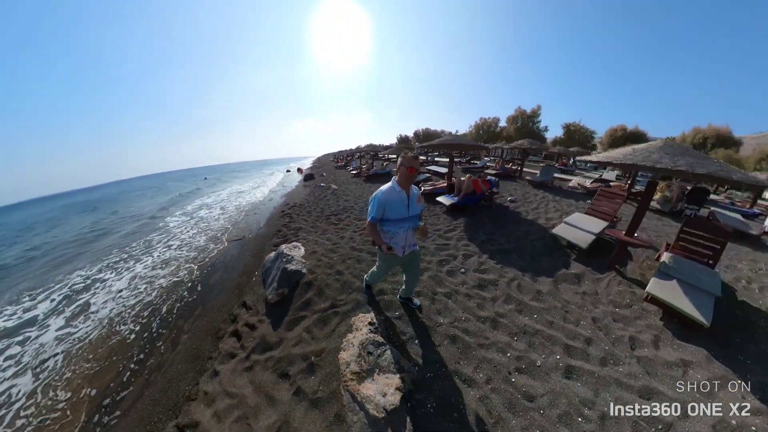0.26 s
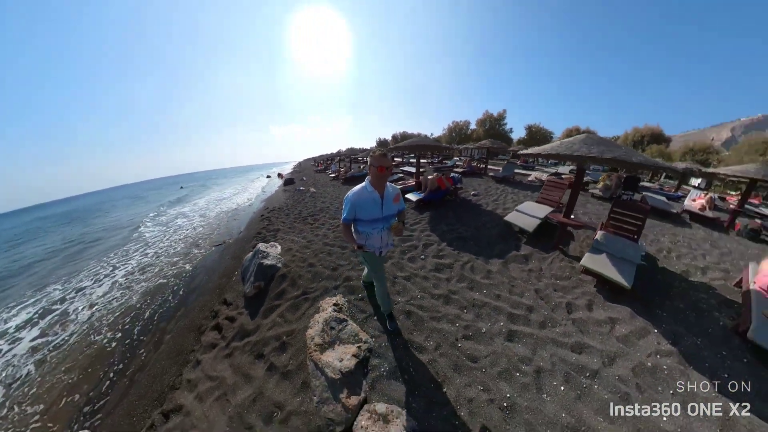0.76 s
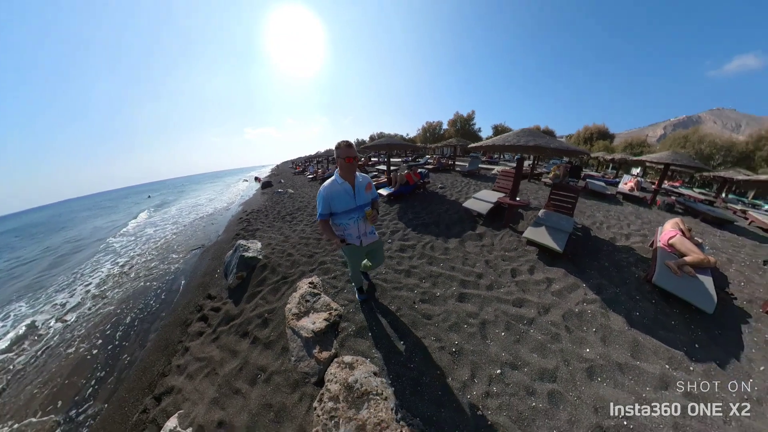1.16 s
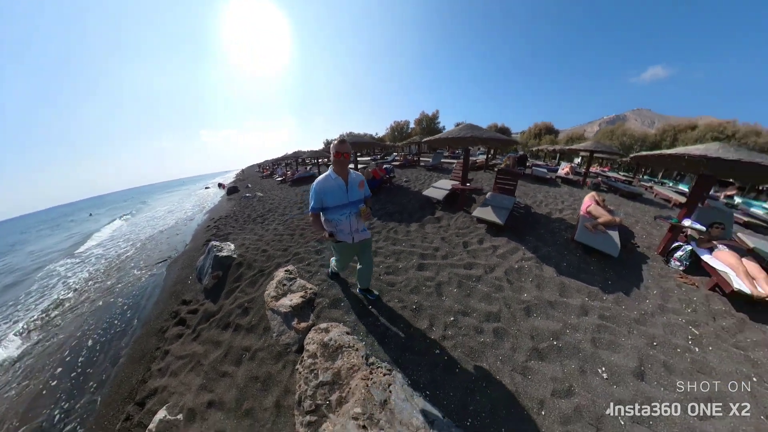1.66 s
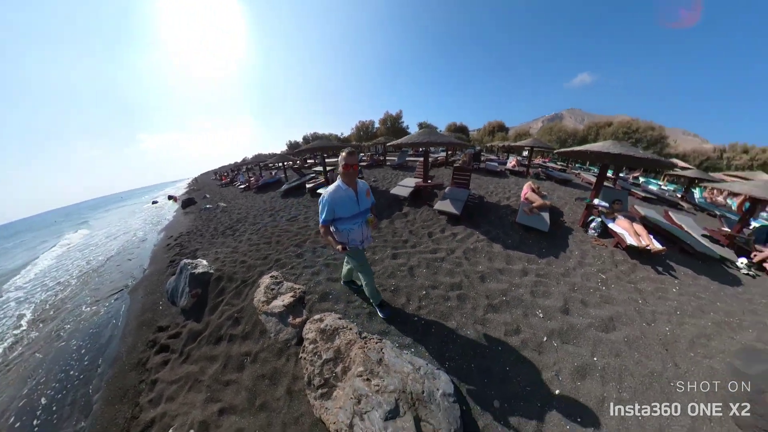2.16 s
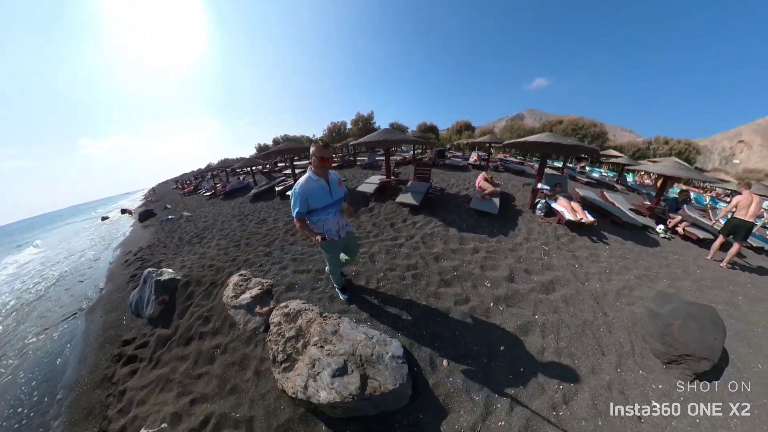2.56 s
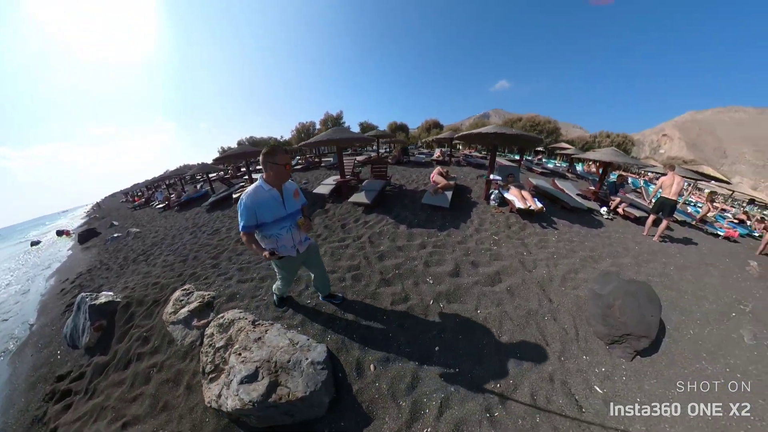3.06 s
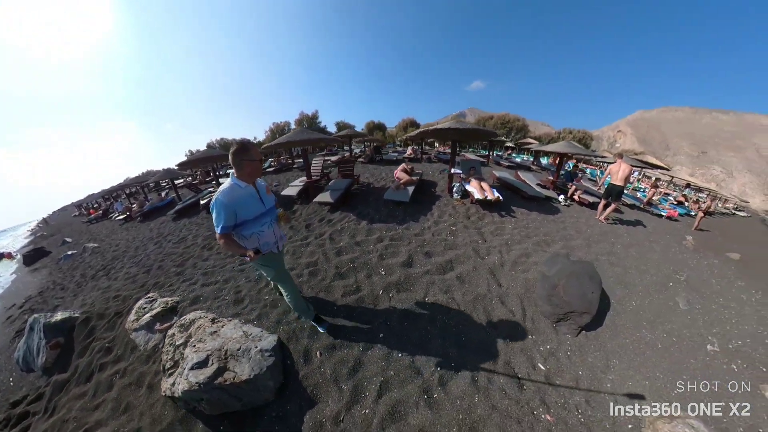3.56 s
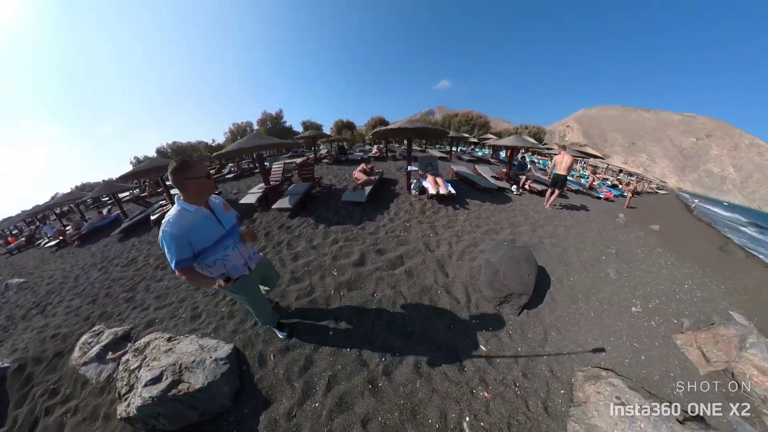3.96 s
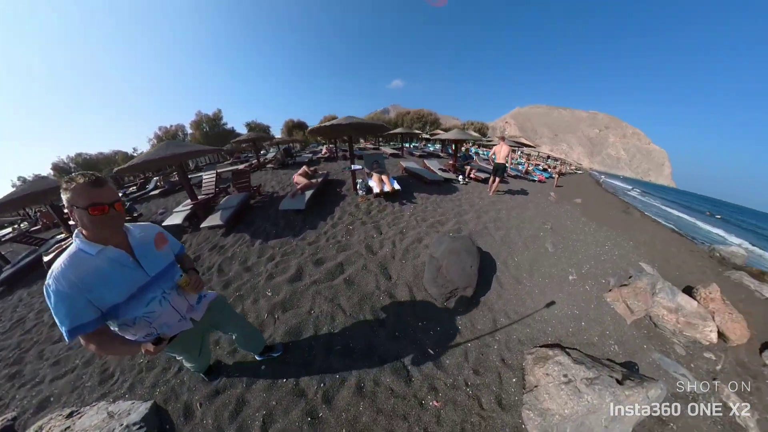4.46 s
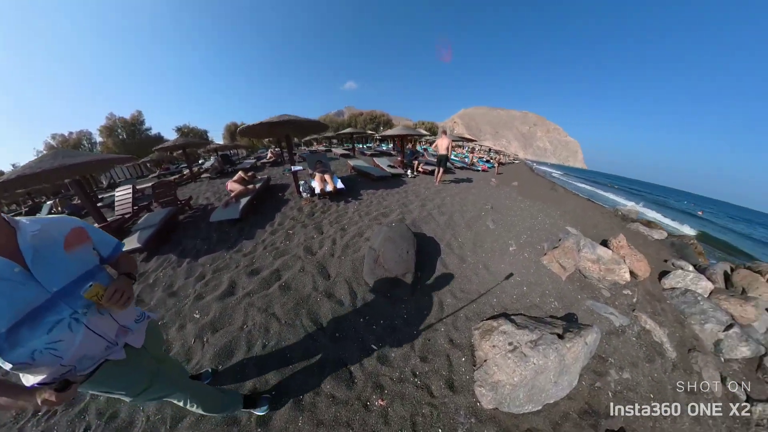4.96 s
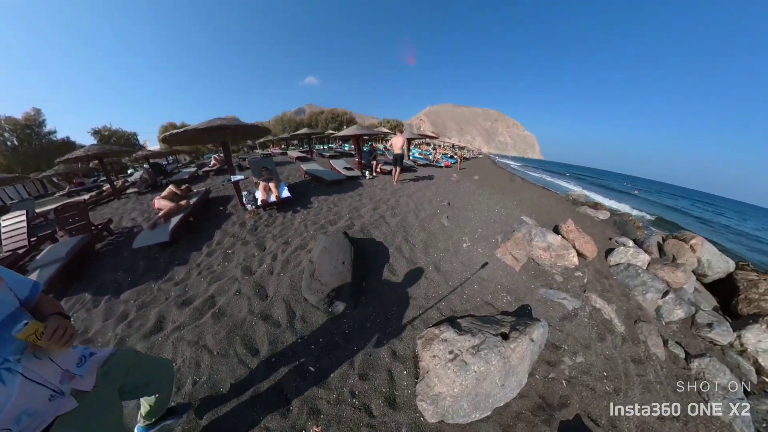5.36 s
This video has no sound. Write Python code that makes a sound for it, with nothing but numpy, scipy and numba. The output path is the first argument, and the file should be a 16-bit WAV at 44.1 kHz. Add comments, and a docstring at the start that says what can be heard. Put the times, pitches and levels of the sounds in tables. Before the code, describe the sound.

Small waves break with a soft roar and splash up a sand and gravel beach in surges, leaving fizzing foam. Wind rumbles and thumps on a carried microphone, strongest around the middle and again near the end. A few pebbles click, and trapped air gulps faintly in the wash. Halfway through, the microphone turns side-on to the water and the surf sounds narrower and a little hollow.

```python
"""Small waves break and wash up a beach of dark sand and gravel: breakers roar, swash splashes,
foam fizzes, each as noise plus ringing bubbles. Gusts rumble and thump on a carried microphone.
A few pebbles click, trapped air gulps, grit ticks. Halfway the microphone turns side-on to the
water: the sound partly cancels between its ports and the treble goes hollow."""
import sys
import numpy as np
from scipy import signal
from scipy.fft import rfft, irfft, next_fast_len
from scipy.io import wavfile
from scipy.ndimage import uniform_filter1d, map_coordinates
from numba import njit

SR = 44100
rng = np.random.default_rng(int(sys.argv[2]) if len(sys.argv) > 2 else 0)


def to_wav(sig):
    """Store sig (one row per channel, or 1-D mono) as 16-bit WAV at the path in sys.argv[1].

    Samples outside -1..1 are clipped; the rate is SR.
    """
    pcm = np.clip(np.atleast_2d(sig), -1, 1) * 32767
    pcm = np.round(pcm).astype(np.int16)
    wavfile.write(sys.argv[1], SR, pcm.T)  # frames by channels


N = 246959
T = np.arange(N) / SR

# Surf envelopes. Each row: time in seconds, then roar, splash and fizz in dB before trim.
SURF_LEVELS = [(0, -43, -51, -66), (0.3, -45.5, -49, -66), (0.42, -40, -48.5, -61), (0.62, -42.5, -51, -63),
               (0.82, -41.5, -45.5, -60), (1.2, -43.5, -46.5, -61), (1.55, -43.5, -46, -59),
               (1.66, -40.5, -42.5, -55.5), (1.84, -36, -42.5, -56.5), (2.05, -39.5, -44.5, -55),
               (2.14, -37.5, -42.5, -54.5), (2.46, -42.5, -46, -58), (2.52, -46.5, -53, -66.5),
               (2.58, -47.5, -51, -65), (2.64, -41, -49, -64), (2.73, -41.5, -47.5, -67),
               (2.85, -38.5, -47.5, -70), (2.94, -42, -53.5, -72.5), (3.08, -39, -46.5, -67.5),
               (3.3, -38.5, -47.5, -67), (3.75, -40, -48, -63), (4.22, -41, -48, -67),
               (4.34, -40.5, -50, -63), (4.41, -40.5, -45, -62), (4.49, -41, -44, -60.5),
               (4.8, -39.5, -47, -64.5), (5.33, -41, -47.5, -62), (5.43, -38.5, -45.5, -59.5),
               (5.56, -38, -44, -57)]
ROAR_TRIM_DB, SPLASH_TRIM_DB, FIZZ_TRIM_DB = 2.5, -1.53, 13
# Water spectra. Each row: frequency in Hz, relative level in dB.
ROAR_HZ_DB = [(40, -9.5), (150, -3), (260, -2), (400, 0), (650, -2.5), (850, -5.5), (1100, -11.5),
              (1600, -20.5), (3000, -33.5), (8000, -54.5)]
SPLASH_HZ_DB = [(300, -27), (550, -6), (900, -3), (1300, 1), (1900, -3), (2600, -7), (3500, -12),
                (6000, -26.5), (9000, -41)]
FOAM_HZ_DB = [(300, -11.5), (900, -8.5), (1900, -1.5), (2900, -0.3), (3400, -1), (5200, -1), (6300, -3.5),
              (7100, -6), (8200, -12.5), (9500, -11)]
# Filter for the foam's left-right difference. Each row: frequency in Hz, gain in dB.
FOAM_WIDTH_HZ_DB = [(2500, -61), (3000, -34.5), (3200, -1.5), (4600, -3.5), (6000, -5), (6700, -22),
                    (7500, -30), (9000, -23)]
# Breeze between gusts. Each row: time in seconds, rumble in dB before trim.
BREEZE_LEVELS = [(0, -36), (0.15, -47.5), (0.24, -42), (0.33, -42), (0.42, -38), (0.47, -40.5), (0.62, -49),
                 (0.79, -49), (1.0, -36), (1.3, -32.5), (1.62, -33.5), (1.78, -36), (2.3, -31), (3.0, -28),
                 (3.35, -31), (3.6, -34.5), (3.74, -38), (4.08, -37), (4.21, -47.5), (4.37, -37.5),
                 (4.53, -42), (4.8, -30), (5.6, -34)]
# Gusts. Each row: peak time in seconds, length in seconds, nominal rumble and flutter in dB.
GUSTS = [(0.049, 0.053, -27, -35), (1.165, 0.063, -28, -35.5), (1.452, 0.076, -36, -41.5),
         (1.92, 0.13, -27.5, -33), (2.363, 0.1, -30.5, -29), (2.498, 0.12, -33.5, -28.5),
         (2.737, 0.071, -27, -30.5), (2.873, 0.091, -20.5, -31.5), (3.17, 0.07, -28.5, -47),
         (3.45, 0.11, -29.5, -41), (3.87, 0.075, -30, -54), (4.654, 0.14, -22.5, -35),
         (4.977, 0.098, -25.5, -34), (5.373, 0.21, -25, -40.5)]
# Sharp wind buffets. Each row: centre in seconds, pitch in Hz, peak in dB before trim.
BUFFETS = [(0.045, 82, -13), (1.154, 75, -17), (1.181, 85, -15), (1.215, 104, -14.5), (1.308, 85, -17.5),
           (1.43, 84, -14), (1.617, 101, -12.5), (1.858, 114, -17.5), (1.936, 123, -13), (2.073, 167, -13),
           (2.351, 157, -14.5), (2.37, 108, -11), (2.452, 156, -6.5), (2.474, 165, -12), (2.509, 112, -9.5),
           (2.546, 190, -11.5), (2.593, 157, -11.5), (2.636, 124, -14.5), (2.741, 73, -8),
           (2.852, 116, -10), (2.897, 62.4, -10.5), (2.922, 97, -9), (2.979, 75.4, -11.5), (3.107, 95, -16),
           (3.16, 70, -14), (4.365, 83, -18), (4.391, 69, -20.5), (4.52, 101, -20), (4.611, 182, -8.5),
           (4.648, 125, -13.5), (4.671, 67, -12.5), (4.698, 132, -15.5), (4.912, 80, -12.5),
           (4.958, 93, -11.5), (4.975, 108, -14.5), (5.236, 153, -16), (5.302, 153, -14), (5.345, 144, -11),
           (5.428, 93, -11)]
BREEZE_TRIM_DB, BUFFET_TRIM_DB = 1.06, -4.0
# Spectra of large, small and finest eddies. Each row: frequency in Hz, relative level in dB.
RUMBLE_HZ_DB = [(10, -24.5), (22, -8), (35, 1.5), (70, 3), (110, -2), (150, -11.5), (250, -33),
                (500, -53.5), (1500, -90)]
FLUTTER_HZ_DB = [(50, -23.5), (100, -19), (150, 3.5), (220, -1.5), (310, -9.5), (450, -20), (900, -44),
                 (2500, -77)]
BUZZ_HZ_DB = [(150, -27.5), (240, 2.5), (310, 2), (385, -3.5), (450, -18.5), (700, -34.5), (2000, -72.5)]
# Pebble knocks. Each row: start in seconds, click peak in dB, gravel scuff in dB.
PEBBLE_KNOCKS = [(0.212, -29, -55), (0.395, -16, -44), (4.322, -26, -54), (5.561, -28, -52)]
# Modes of a pebble on gravel. Each row: frequency in Hz, relative level in dB, T60 in seconds.
PEBBLE_MODES = [(414, 3, 0.011), (1100, -0.5, 0.0086), (1540, -2, 0.0089), (2520, -5, 0.0077),
                (4480, -6, 0.0075)]
# Air trapped by the swash. Each row: start in seconds, starting pitch in Hz, level in dB.
GULPS = [(1.011, 537, -24), (2.782, 620, -28), (4.335, 470, -25.5)]
# Microphone turning away. Each row: time in seconds, share of the shore heard head-on in dB.
FACING_LEVELS = [(0, -1.5), (2.45, -3.5), (2.66, -1.5), (2.76, -8), (2.87, -10.5), (2.92, -24.5),
                 (4.2, -26.5), (5.3, -31), (5.6, -36)]
# Grit ticks. Each row: start in seconds, starting level in dB.
TICKS = [(4.217, -45), (4.299, -47), (4.32, -50), (4.453, -47), (4.465, -50), (4.75, -47), (5.31, -46),
         (5.562, -37.5)]
# Spectra of shifting gravel and of a tick. Each row: frequency in Hz, relative level in dB.
SCUFF_HZ_DB = [(200, -7), (450, -7), (1300, 8), (2800, 0.5), (5500, 1.5), (8500, -2)]
TICK_HZ_DB = [(2000, -25), (5000, -10), (7000, 4), (8500, -6)]


def undb(db):
    return 10 ** (np.asarray(db) / 20)


def unit_rms(x):
    return x / np.sqrt(np.mean(x ** 2))


def curves(table):
    """Table columns, interpolated linearly in time."""
    times_s, *columns = np.transpose(table)
    return [np.interp(T, times_s, column) for column in columns]


def colour(x, spectrum):
    """Filter by (Hz, dB) points."""
    size = next_fast_len(N)
    hz, db = np.transpose(spectrum)
    bins_hz = np.maximum(np.fft.rfftfreq(size, 1 / SR), 1)
    gain = undb(np.interp(np.log(bins_hz), np.log(hz), db))
    return irfft(rfft(x, size) * gain, size)[:N]


def wander(rate_hz):
    """Smooth random curve, rms 1."""
    knots = rng.standard_normal(2048)
    coarse_s = T[::64]
    smooth = map_coordinates(knots, [coarse_s * rate_hz], order=2, mode="wrap")
    return np.interp(T, coarse_s, unit_rms(smooth))


def add(out, start_s, sound):
    start = max(int(start_s * SR), 0)
    out[start:start + len(sound)] += sound[:N - start]


@njit
def grains(start_shares, hz, cycles, gains, glide):
    """Decaying sines; pitch rises by the fraction glide."""
    out = np.zeros(N)
    for k in range(len(hz)):
        first = int(start_shares[k] * N)
        length = int(cycles * SR / hz[k]) + 1
        phase = 0.
        for i in range(min(length, N - first)):
            phase += 2 * np.pi * hz[k] * (1 + glide * i / length) / SR
            out[first + i] += gains[k] * np.exp(-6 * i / length) * np.sin(phase)
    return out


def swarm(low_hz, high_hz, cycles, scatter_db, glide, count):
    """Cloud of bubbles or grains, even in spectrum; scatter makes a few louder."""
    start_shares, pitch, luck = rng.random((count, 3)).T
    hz = low_hz * (high_hz / low_hz) ** pitch
    gains = undb(scatter_db * np.minimum(-np.log(1 - luck), 5)) * hz
    return unit_rms(grains(start_shares, hz, float(cycles), gains, float(glide)))


def breakers():
    """Tumbling water: a rush with large bubbles gurgling in it."""
    bubbles = swarm(257.3, 1191, cycles=33, scatter_db=0, glide=0.09, count=1800)
    water = rng.standard_normal(N) + undb(-16.5) * bubbles
    return unit_rms(colour(water, ROAR_HZ_DB))


def swash():
    """The broken wave splashes up the gravel: drops and mid-size bubbles in a wash."""
    drops = swarm(877, 3690, cycles=26, scatter_db=1.1, glide=0.18, count=4000)
    water = rng.standard_normal(N) + undb(-12.5) * drops
    return unit_rms(colour(water, SPLASH_HZ_DB))


def churn(x, depth_db, width_bins):
    """Patches of bubbles come and go, each a few hundredths of a second long."""
    spectrum = signal.stft(x, nperseg=1024)[2]
    patches = uniform_filter1d(rng.standard_normal(spectrum.shape), size=width_bins, axis=0)
    patches = unit_rms(uniform_filter1d(patches, size=4, axis=1))
    return signal.istft(spectrum * undb(depth_db * patches))[1][:N]


def foam():
    """Tiny bubbles ring and burst in clumps over a hiss."""
    bubbles = swarm(1800, 8500, cycles=33, scatter_db=2.5, glide=0.1, count=11000)
    fizz = rng.standard_normal(N) + undb(-9.5) * bubbles
    return unit_rms(colour(churn(fizz, depth_db=1.93, width_bins=10), FOAM_HZ_DB))


def gust_gains(equal_db=-50.5, flutter_slope=0.6091):
    """Rumble and flutter strength: gusts swell and fade on top of the breeze."""
    breeze_db = curves(BREEZE_LEVELS)[0] + BREEZE_TRIM_DB
    rumble_power = undb(breeze_db) ** 2
    flutter_power = undb(equal_db + flutter_slope * (breeze_db - equal_db)) ** 2
    for peak_s, length_s, rumble_db, flutter_db in GUSTS:
        swell = np.exp(-(2 * (T - peak_s) / length_s) ** 2)
        rumble_power += swell * undb(rumble_db) ** 2
        flutter_power += swell * undb(flutter_db) ** 2
    return np.sqrt(rumble_power), np.sqrt(flutter_power)


def eddies(spectrum, span_s, evenness):
    """Turbulent pressure at the port, its strength partly evened out."""
    pressure = colour(rng.standard_normal(N), spectrum)
    power = uniform_filter1d(pressure ** 2, int(span_s * SR))
    return unit_rms(pressure / power ** (evenness / 2))


def buffets():
    """Single big eddies thump the port and sweep the others aside."""
    thumps, lull = np.zeros(N), np.zeros(N)
    for centre_s, hz, db in BUFFETS:
        start_s = centre_s - 2 / hz
        cycles = np.arange(int(4 * SR / hz)) * hz / SR - 2
        push = np.cos(2 * np.pi * cycles + rng.uniform(0, 2 * np.pi)) * np.exp(-(cycles / 0.53) ** 2)
        add(thumps, start_s, undb(db + BUFFET_TRIM_DB) * push)
        add(lull, start_s, np.exp(-(cycles / 0.63) ** 2))
    return thumps, np.clip(1 - 0.64 * lull, 0, 1)


def wind(flutter_onset_db=-43.5, buzz_equal_db=-22):
    """Large eddies rumble; small ones flutter in stronger gusts and buzz in the strongest."""
    rumble_gain, flutter_gain = gust_gains()
    buzz_gain = flutter_gain ** 2 / undb(buzz_equal_db)
    gate = 1 / (1 + (undb(flutter_onset_db) / flutter_gain) ** 2)
    clumps = unit_rms(undb(2.2 * wander(rate_hz=42)))
    rumble = rumble_gain * eddies(RUMBLE_HZ_DB, span_s=0.11, evenness=0.71)
    flutter = flutter_gain * gate * eddies(FLUTTER_HZ_DB, span_s=0.083, evenness=0.55)
    thumps, duck = buffets()
    buzz = buzz_gain * gate * eddies(BUZZ_HZ_DB, span_s=0.0099, evenness=0.7)
    return clumps * (duck * (rumble + flutter) + buzz) + thumps


def pebbles(crack_decay_s=0.0032):
    """Stones knock together: a short crack and heavily damped modes."""
    out, t = np.zeros(N), T[:SR // 20]
    for start_s, peak_db, _ in PEBBLE_KNOCKS:
        detunes = 1 + 0.024 * rng.standard_normal(len(PEBBLE_MODES))
        ring = sum(undb(db - 60 * t / t60_s) * np.sin(2 * np.pi * hz * detune * t)
                   for (hz, db, t60_s), detune in zip(PEBBLE_MODES, detunes))
        crack = 0.08 * rng.standard_normal(len(t)) * np.exp(-t / crack_decay_s)
        knock = ring + crack
        add(out, start_s, undb(peak_db) * knock / np.abs(knock).max())
    return out


def scuffs(half_width_s=0.03):
    """Small stones slide around each knocked pebble."""
    gravel = swarm(320, 6200, cycles=4.9, scatter_db=2.5, glide=0, count=40000)
    envelope = sum(undb(db) * np.exp(-((T - knock_s) / half_width_s) ** 2)
                   for knock_s, _, db in PEBBLE_KNOCKS)
    return envelope * unit_rms(colour(gravel, SCUFF_HZ_DB))


def gulps(t60_s=0.048, rise_per_s=1.5):
    """Single large bubbles ring and rise in pitch as they surface."""
    out, t = np.zeros(N), T[:SR // 5]
    for start_s, hz, db in GULPS:
        phase = 2 * np.pi * hz * t * (1 + rise_per_s * t / 2)
        envelope = undb(db - 60 * t / t60_s) * (1 - np.exp(-hz * t))
        add(out, start_s, envelope * np.sin(phase))
    return out


def side_on(x, notch_hz=4750, lift_db=3.5, hollowness=2.16):
    """Side sound reaches the ports in turn: it cancels at half a cycle of lag and recovers above."""
    size = next_fast_len(N)
    ratio = np.fft.rfftfreq(size, 1 / SR) / notch_hz
    comb = np.abs(np.cos(np.pi / 2 * ratio)) ** hollowness
    lift = undb(lift_db * np.minimum(ratio, 2))
    return irfft(rfft(x, size) * comb * lift, size)[:N]


def ticks(t60_s=0.025):
    """Coarse sand grains snap against each other: brief bright crackles."""
    envelope, t = np.zeros(N), T[:SR // 20]
    for start_s, db in TICKS:
        add(envelope, start_s, undb(db - 60 * t / t60_s))
    return envelope * unit_rms(colour(rng.standard_normal(N), TICK_HZ_DB))


def scene():
    """Shore and wind centred; only the foam is wide, while the microphone faces it."""
    roar_db, splash_db, fizz_db = curves(SURF_LEVELS)
    facing = undb(curves(FACING_LEVELS)[0])
    slosh = undb(0.5 * wander(rate_hz=8.3))  # uneven run-up
    fizz_gain = undb(fizz_db + FIZZ_TRIM_DB) * slosh
    shore = undb(roar_db + ROAR_TRIM_DB) * breakers()
    shore += undb(splash_db + SPLASH_TRIM_DB) * slosh * swash()
    shore += fizz_gain * foam()
    shore += pebbles() + scuffs() + gulps() + ticks()
    mid = facing * shore + (1 - facing) * side_on(shore) + wind()
    side = facing * fizz_gain * colour(foam(), FOAM_WIDTH_HZ_DB)
    return np.array([mid + side, mid - side])


def record(dry, corner_hz=8010, cutoff_hz=9200):
    """Two low-passes round off the high treble, then cut it."""
    rounded = signal.sosfilt(signal.butter(16, corner_hz, fs=SR, output="sos"), dry)
    return signal.sosfilt(signal.ellip(8, .2, 70, cutoff_hz, fs=SR, output="sos"), rounded)


dry = scene()
out = record(dry)
to_wav(out)
```